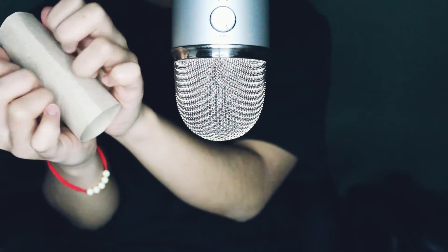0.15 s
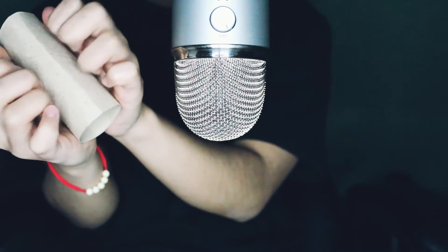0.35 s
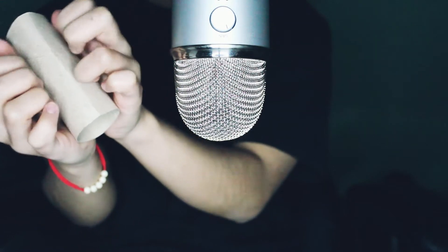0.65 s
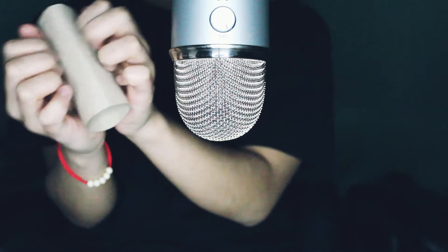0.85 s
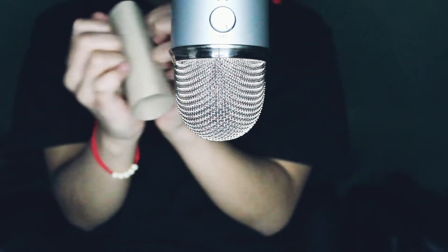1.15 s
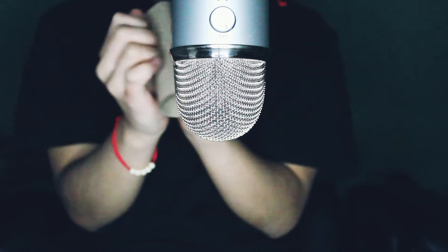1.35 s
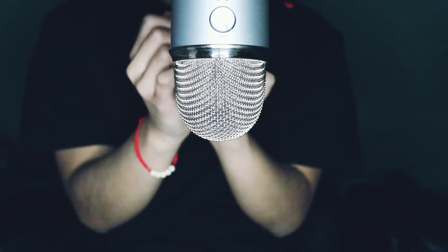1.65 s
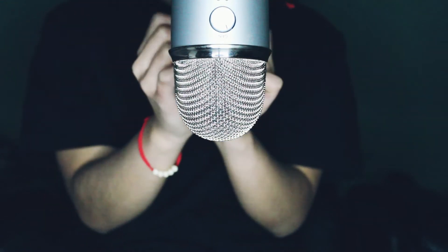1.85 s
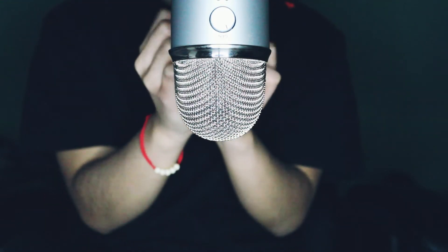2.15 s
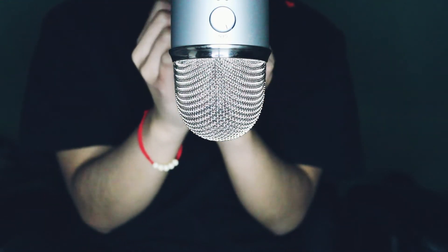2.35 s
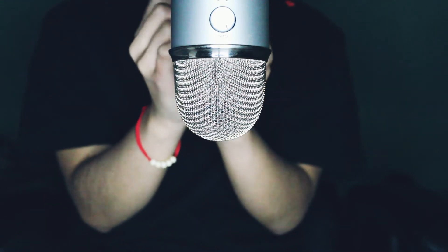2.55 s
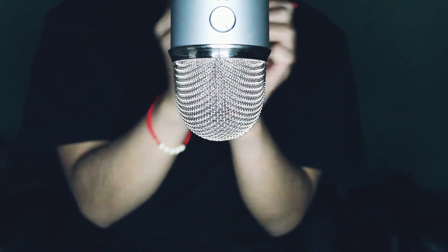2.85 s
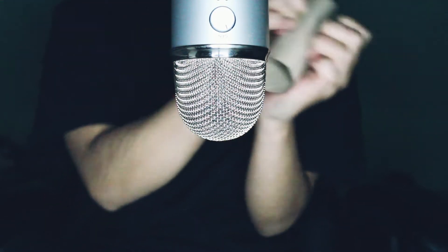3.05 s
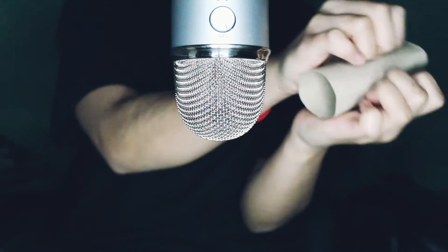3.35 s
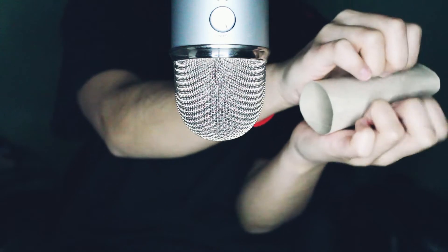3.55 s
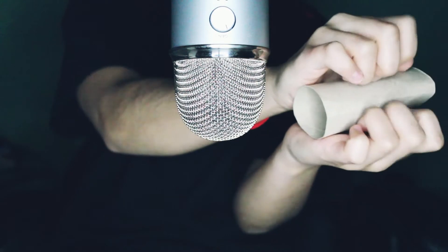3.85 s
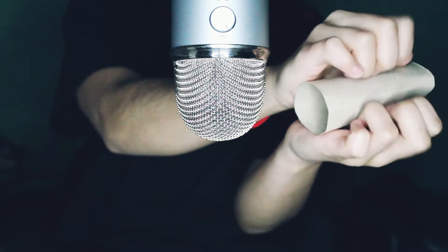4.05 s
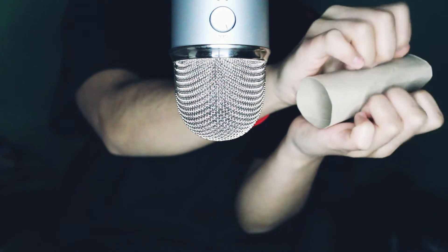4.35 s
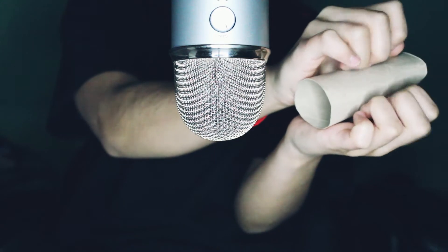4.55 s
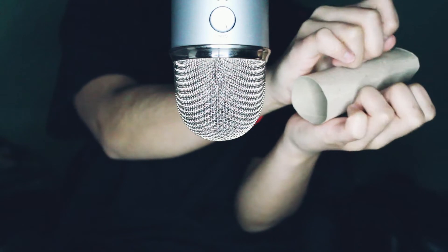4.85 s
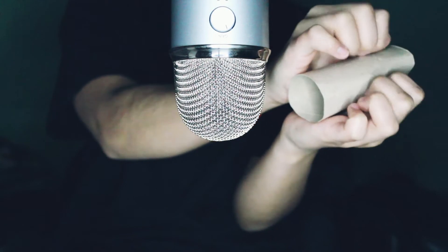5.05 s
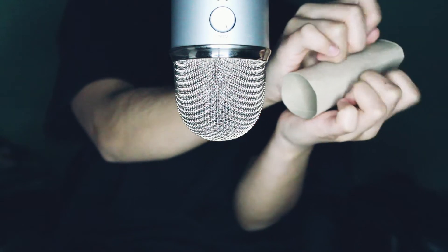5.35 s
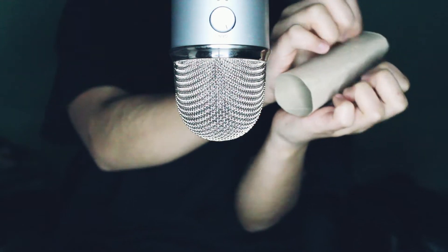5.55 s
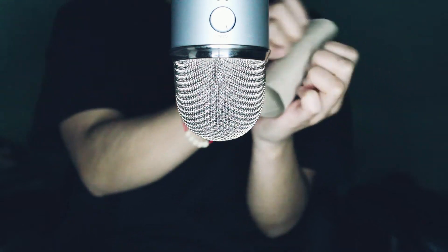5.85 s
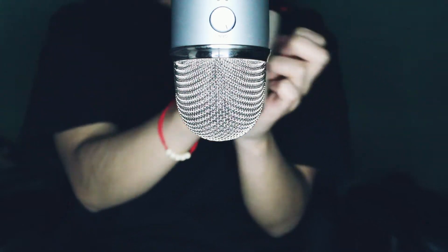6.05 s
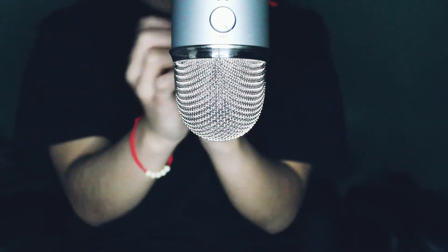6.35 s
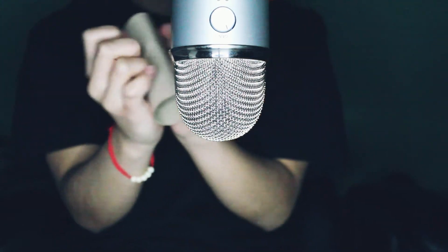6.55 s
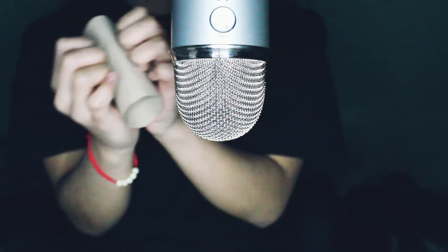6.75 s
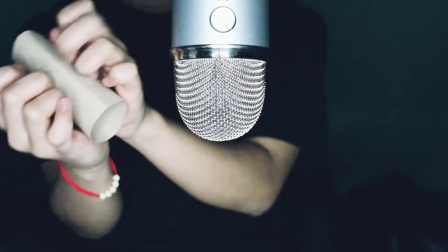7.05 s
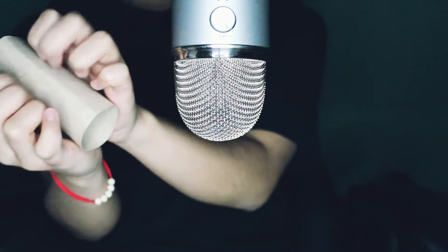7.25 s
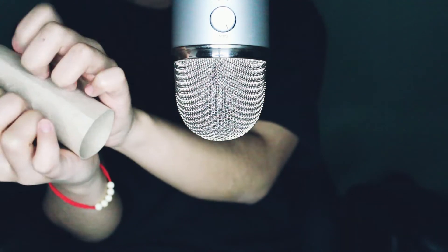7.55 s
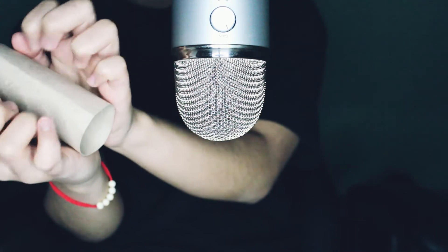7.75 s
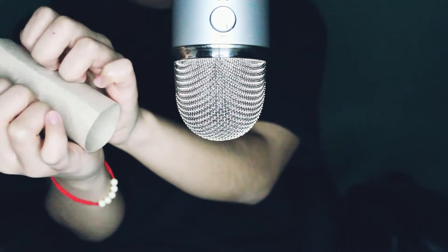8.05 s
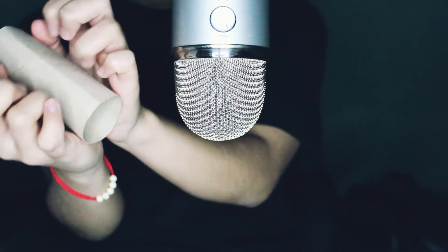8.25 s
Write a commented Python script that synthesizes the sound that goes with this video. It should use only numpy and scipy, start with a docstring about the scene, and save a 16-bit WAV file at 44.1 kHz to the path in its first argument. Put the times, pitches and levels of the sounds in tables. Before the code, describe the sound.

Fingertips and nails tap a hollow cardboard tube very close to a stereo microphone in a small quiet room. Soft, busy taps and scuffs start on the left, pass behind the microphone growing denser and brighter with a few low thuds, then become louder, hollow, separate knocks on the right. They return through the centre to the left, thinning and fading.

```python
"""Fingers on a cardboard tube, close to the microphone

In a small, quiet room, fingers drum and scratch on a tube carried from side to side near a stereo microphone.
Each touch is a burst of blows and noise rung through the tube's resonances, then a short drag of uneven grains.
Scrapes, faint to strong and short to long, are such grains without a tap.
The wall also flexes with a soft thump, which only so near a microphone picks up.
Deep jolts are band-passed noise; sparse reflections and steady coloured noise make the room."""
import sys
import numpy as np
from scipy import signal
from scipy.fft import rfft, irfft
from scipy.io import wavfile
from scipy.ndimage import uniform_filter1d

SR = 44100
rng = np.random.default_rng(int(sys.argv[2]) if len(sys.argv) > 2 else 0)


def unload_audio(sound):
    """Save the sound as a 16-bit wav file, at the path given as the first command line argument."""
    columns = np.transpose(np.atleast_2d(sound))
    # keep every value between -1 and 1, then stretch to whole-number steps
    steps = np.round(np.clip(columns, -1, 1) * 32767)
    wavfile.write(sys.argv[1], SR, steps.astype(np.int16))


N = 370881  # length in samples

SIZE = 2048  # samples in a response before it is cut or convolved
HZ = np.fft.rfftfreq(SIZE, 1 / SR)
# Where the tube is held before the microphone. Each row: time in seconds, left minus right in dB.
PATH = [(0, 13), (1.35, 8.5), (2.1, -2.5), (3.3, -1.5), (4.2, -16), (5.9, -12.5), (6.7, -2.5), (7.5, 7)]
REFERENCE_TAP_DB, USUAL_BRIGHT_DB = -6.5, 7.5  # a tap's force and brightness are judged against these
GRAIN_SPREAD_DB = 4  # how uneven the grains of a dragging nail are
DRAG_RISE_S, DRAG_LIFT_S, DRAG_UNEVEN_DB = 0.0026, 0.018, 4
TREMBLE = 0.22  # push of a drag on the wall, as a share of the drag
LEAD_SAMPLES = 20  # the capsule responses start this late, to leave room for their phase turn


def amp(db):
    """Decibels to gain."""
    return 10 ** (np.asarray(db) / 20)


def evened(x):
    """Scales to an rms of one."""
    return x / np.sqrt(np.mean(x ** 2) + 1e-20)


def read(points, hz):
    """A spectrum in dB, joined on a log-frequency axis."""
    f, db = np.transpose(points)
    return np.interp(np.log(hz + 1), np.log(f), db)


def at(curve, s):
    """Value of a control curve at time s."""
    return np.interp(s, *np.transpose(curve))


def add(mix, s, sound):
    """Mixes a sound into both channels at time s, cut at the end of the scene."""
    part = mix[:, round(s * SR):][:, :sound.shape[1]]
    part += sound[:, :part.shape[1]]


def ring(db):
    """The minimum-phase impulse response, of unit energy, that has this spectrum."""
    cepstrum = irfft(np.log(amp(db)))
    # folding the cepstrum forward in time makes the response causal
    cepstrum[1:SIZE // 2] *= 2
    cepstrum[SIZE // 2 + 1:] = 0
    response = irfft(np.exp(rfft(cepstrum)))
    return evened(response) / np.sqrt(SIZE)


def ripple(width_hz):
    """Random peaks and dips over frequency: every spot on the tube answers differently."""
    knots = np.arange(0, SR, width_hz)
    heights = rng.standard_normal(SIZE)[:len(knots)]
    return np.interp(HZ, knots, heights)


def grains(count, spread_db):
    """Noise of uneven grains: paper fibres catching and letting go."""
    grain_db = spread_db * np.minimum(rng.exponential(1, count), 6)
    return evened(rng.standard_normal(count) * amp(grain_db))


def uneven(count):
    """The stick and slip of a moving finger: slow chance of rms one."""
    return evened(uniform_filter1d(rng.standard_normal(count), size=300))


def hush():
    """The quiet room: steady noise of rms one, independent in the two channels."""
    # Room background. Each row: frequency in Hz, relative density in dB per Hz.
    background = [(20, -8), (70, -1), (450, -17), (1400, -14.5), (16000, -30)]
    noise = rng.standard_normal((2, N + SIZE))
    coloured = signal.fftconvolve(noise, ring(read(background, HZ))[None], axes=1)
    return evened(coloured[:, SIZE:N + SIZE])


def touches():
    """Taps and grazes in order: (s, level dB, brightness dB, sharpness of the first blow)."""
    # The clear taps. Each row: start in seconds, level in dB, brightness in dB (a nail high, a fingertip low).
    clear_taps = [(0.087, -20.5, -3), (0.1445, -18, 4), (0.3154, -18.5, 4), (0.449, -19, 4),
                  (0.5302, -22, 10), (0.597, -20.5, 15), (0.6147, -16, 5), (0.6848, -19, 4.5),
                  (0.744, -21, 6.5), (0.8264, -22, 2), (0.9358, -21.5, -5), (1.0051, -22, 2),
                  (1.0857, -18.5, 12), (1.15, -20.5, 7), (1.334, -19, 11), (1.386, -19.5, 10),
                  (1.577, -20, 4), (1.586, -14.5, 2.5), (1.6793, -15.5, 9.5), (1.7363, -15, 8),
                  (1.7897, -17.5, 7.5), (1.8114, -21.5, 13), (1.8937, -16, 13), (1.9021, -19, 13),
                  (1.9778, -20, -3), (2.0044, -14.5, 12.5), (2.0481, -17, 14.5), (2.0893, -12, 9.5),
                  (2.1976, -19.5, 7), (2.2216, -15, 10), (2.2721, -16.5, 8.5), (2.3048, -23.5, 10),
                  (2.313, -16.5, 11), (2.3502, -15, 10), (2.4117, -11.5, 10.5), (2.4917, -16, 9),
                  (2.6197, -16, 5), (2.6281, -18, 13), (2.7012, -18, 13.5), (2.7271, -16.5, 14.5),
                  (2.8056, -17, 6), (2.8251, -18.5, 10), (2.8548, -14, 3), (2.9158, -16, 14),
                  (2.9527, -19.5, 4.5), (3.0036, -14, 5.5), (3.0402, -17.5, 9), (3.0927, -12, 12),
                  (3.105, -11, 2), (3.1967, -14, 6), (3.2115, -17, -2), (3.284, -20.5, 8),
                  (3.302, -18.5, 2.5), (3.353, -11.5, 3), (3.428, -17.5, 5), (3.435, -15.5, 13),
                  (3.5935, -18, -4.5), (3.658, -21.5, 3), (3.7866, -17.5, 14), (3.8433, -17, 4),
                  (3.8727, -15.5, 1.5), (4.139, -13.5, 7.5), (4.2331, -14.5, 16.5), (4.314, -20, -8),
                  (4.3599, -17, 9.5), (4.4043, -16.5, 4), (4.426, -19.5, -5), (4.4813, -13.5, 23),
                  (4.5193, -13.5, 2), (4.5944, -19, 7), (4.6486, -15, 12), (4.7213, -15.5, 17.5),
                  (4.806, -11.5, 4), (4.8932, -17.5, 7.5), (4.94, -14.5, 5.5), (4.9804, -16.5, 17),
                  (5.063, -15.5, 1), (5.1564, -9.5, 0), (5.297, -18, 2.5), (5.3778, -19, 0),
                  (5.4672, -19, 13), (5.5484, -12.5, -3), (5.569, -13, 13.5), (5.7365, -12, 9),
                  (5.8331, -11.5, 5.5), (5.933, -11.5, 13.5), (5.9654, -15.5, 0), (6.1792, -15.5, 8.5),
                  (6.2723, -14.5, 3), (6.2964, -18.5, 8), (6.3641, -15.5, 14), (6.395, -18.5, 3),
                  (6.6342, -20, 13.5), (6.676, -10, 14), (6.7653, -14, 13), (7.1337, -23.5, 13),
                  (7.151, -19, 8.5), (7.2616, -17.5, 11.5), (7.2676, -17.5, 13.5), (7.6241, -23, 14.5),
                  (7.671, -21, 6), (7.71, -23.5, 13), (7.8519, -25, -2), (7.949, -27.5, 3.5),
                  (8.0423, -23, 8.5), (8.1302, -26, 12.5), (8.3717, -30, 1)]
    # Light grazes: a neighbouring finger scuffs the tube without a sharp blow. Each entry: start in seconds.
    graze_starts = [0.016, 0.045, 0.209, 0.417, 0.551, 0.84, 1.014, 1.166, 1.245, 1.283, 1.439, 1.505,
                    1.666, 1.708, 2.116, 2.526, 3.336, 3.4, 3.53, 3.669, 3.755, 3.771, 3.967, 4.058, 4.18,
                    4.331, 4.737, 4.829, 4.963, 7.073, 7.489, 7.542]
    graze_db = -24  # average level
    grazes = [(s, graze_db + rng.standard_normal(), USUAL_BRIGHT_DB, 0) for s in graze_starts]
    return sorted([(*row, 1) for row in clear_taps] + grazes)


def side(s):
    """Left minus right dB of a touch at time s, somewhere along the tube."""
    return at(PATH, s) + rng.standard_normal()


def cupping(side_db):
    """How far the tube is cupped in the hands right behind the microphone, 0-1."""
    return np.exp(-(side_db / 5.04) ** 2)


def facing(side_db):
    """Spectrum in dB: the top treble is open on the left and shaded by the hands on the right."""
    air_hz, air_per_side = 5960, 0.2  # dB of top treble per dB of side
    tilt = np.tanh(2 * np.log((HZ + 1) / air_hz)) * np.minimum(HZ / air_hz, 1)
    return air_per_side * side_db * tilt


def tube(side_db, bright_db):
    """Spectrum in dB of the tube at one touch: cupping raises its pitch, a nail its treble, each spot differs."""
    # Resonances of the open tube. Each row: frequency in Hz, width in Hz, average level in dB,
    # change in dB when it is cupped behind the microphone.
    modes = [(765, 230, 10.5, -10), (1353, 154.5, 21, -1.13), (1810, 345, 7, 2), (2728, 308, 5, 0)]
    # Broad colour of the cardboard under the resonances. Each row: frequency in Hz, level in dB.
    wall = [(100, -5), (450, 1), (1100, -42), (2300, -4), (4800, -3.5), (10000, -13), (15500, -20.5)]
    spot_spread_db, rise, rise_per_db = 1.68, 0.054, 0.005  # pitch rise as a share, more for each dB of brightness
    cupped = cupping(side_db)
    hz = HZ / (1 + cupped * (rise + rise_per_db * bright_db))
    power = amp(read(wall, hz)) ** 2
    for f, width, db, change_db in modes:
        spot_db = spot_spread_db * rng.standard_normal()
        peak = 1 / (1 + ((hz - f) / width) ** 2) ** 2
        power += amp(db + cupped * change_db + spot_db) ** 2 * peak
    treble = 1 / (1 + (1800 / (HZ + 1)) ** 6)
    return 10 * np.log10(power) + bright_db * treble + 2.37 * ripple(325.0)


def capsules(db, side_db):
    """Left and right responses: off the axis the two capsules differ in level, phase and fine colour."""
    off_axis = np.tanh(side_db / 6)
    apart_db = 2 * (1 + abs(off_axis)) * ripple(628.0) * np.minimum(HZ / 2500, 1)
    turn = np.exp(-.5j * off_axis)
    left = irfft(rfft(np.roll(ring(db + apart_db), LEAD_SAMPLES)) * turn)
    right = irfft(rfft(np.roll(ring(db - apart_db), LEAD_SAMPLES)) / turn)
    gains = evened(amp(np.array([[side_db], [-side_db]]) / 2))
    return gains * np.array([left, right])[:, :SIZE // 2]


def tap(response, sharpness, crunch=0.71, crunch_s=0.0027, tap_s=0.0062, settle_s=0.0011):
    """A first blow, smaller ones as the finger settles, and a crunch of fibres, with the energy of tap_s at rms one."""
    settling_blows, settle_share = 2, 0.48  # the share is their greatest size
    t = np.arange(SIZE // 2) / SR
    fibres = grains(len(t), 2.34) * np.sqrt(t) * np.exp(-2 * t / crunch_s)
    blow = crunch * evened(fibres) / np.sqrt(len(t))
    blow[0] += sharpness
    for delay, size in rng.random((settling_blows, 2)):
        blow[int(2 * delay * settle_s * SR)] += settle_share * size
    sound = signal.fftconvolve(response, blow[None], axes=1)
    return evened(sound) * np.sqrt(tap_s * SR / sound.shape[1])


def stroke(gap, longest_s=0.11, fade_db_per_s=80):
    """Pressure of a dragging finger: it lands, eases unevenly and lifts by the next touch unless that is too soon."""
    t = np.arange(SR // 5) / SR
    end_s = np.clip(gap, DRAG_LIFT_S, longest_s)
    lift = np.clip((end_s - t) / DRAG_LIFT_S, 0, 1)
    easing = amp(DRAG_UNEVEN_DB * uneven(len(t)) - fade_db_per_s * t)
    return np.minimum(t / DRAG_RISE_S, 1) * lift * easing


def rubbed(drag, side_db, bright_db):
    """The grains of a dragging nail, coloured by paper and tube."""
    # Colour of nail on paper, on top of the wall's. Each row: frequency in Hz, level in dB.
    paper = [(450, 4.5), (1400, -1.5), (5000, 5.5), (13000, 9.5)]
    response = capsules(tube(side_db, bright_db) + read(paper, HZ) + facing(side_db), side_db)
    return signal.fftconvolve(response, drag[None], axes=1)


def flexed(push, side_db):
    """The low thump of the wall giving way under a push: deeper on the right, muffled where cupped."""
    # Colour of the flexing wall. Each row: frequency in Hz, level in dB.
    thump = [(22, -31), (60, -2.5), (300, -3), (2000, -54.5)]
    deep_hz, deep_per_side = 80, 0.31  # dB of deep bass per dB of side to the right
    muffle_hz, muffle_db = 232, 3.5  # the muffling is complete above this pitch
    ripple_hz = 128  # spacing of the chance peaks
    # the near field mostly reaches the capsules in opposite polarity
    left, left_spread, right = -0.51, 0.66, 1.23
    deep_db = -deep_per_side * min(side_db, 0) * np.exp(-(HZ / deep_hz) ** 2)
    flex_db = read(thump, HZ) + deep_db + 2 * ripple(ripple_hz)
    flex_db = flex_db - muffle_db * cupping(side_db) * np.clip(2 * HZ / muffle_hz - 1, 0, 1)
    flex = np.array([ring(flex_db + 2 * ripple(ripple_hz)) for _ in range(2)])
    gains = np.array([[left + left_spread * rng.standard_normal()], [right]])
    return gains * signal.fftconvolve(flex, push[None], axes=1)


def tapping():
    """Each touch rings and flexes the tube; the finger then drags briefly."""
    # The wall's thump as the tube comes nearer and turns away. Each row: time in seconds,
    # relative strength in dB under a reference tap.
    nearness = [(0, -22), (1.3, -27.5), (1.65, -22), (3.3, -28), (4.3, -23.5), (6.3, -35.5), (8.1, -26)]
    # How firmly a finger stays on. Each row: time in seconds, level of the drag in dB after a reference tap.
    firmness = [(0, -31), (1.3, -34.5), (5.2, -33), (6, -44), (8.1, -36)]
    drag_follows, thump_follows = 0.26, 0.47  # dB for each dB that a tap is above the reference
    drag_bright_share = 0.33  # how much of a tap's brightness its drag keeps
    blow = 23  # scale of a tap's push on the wall
    out, rows = np.zeros((2, N)), touches()
    gaps = np.diff([row[0] for row in rows], append=N / SR)
    for (s, tap_db, bright_db, sharpness), gap in zip(rows, gaps):
        side_db = side(s)
        harder_db = tap_db - REFERENCE_TAP_DB
        nail_db = bright_db - USUAL_BRIGHT_DB
        early_s = s - LEAD_SAMPLES / SR
        response = capsules(tube(side_db, nail_db) + facing(side_db), side_db)
        add(out, early_s, amp(tap_db) * tap(response, sharpness))

        pressure = amp(at(firmness, s) + drag_follows * harder_db) * stroke(gap)
        drag = pressure * grains(len(pressure), GRAIN_SPREAD_DB)
        add(out, early_s, rubbed(drag, side_db, drag_bright_share * nail_db))

        push = TREMBLE * drag
        thump_db = at(nearness, s) + thump_follows * harder_db + 2 * rng.standard_normal()
        push[0] += blow * amp(thump_db)
        add(out, s, flexed(push, side_db))
    return out


def room(x, t60=0.11, first_s=0.0034):
    """A short tail of sparse reflections, different at each capsule."""
    t = np.arange(SR // 2) / SR
    reflections = rng.standard_normal((2, len(t))) * (rng.random((2, len(t))) < .1)
    decay = (t > first_s) * amp(-60 * t / t60)
    tail = evened(reflections * decay) / np.sqrt(len(t))
    return signal.fftconvolve(x.mean(0)[None], tail, axes=1)[:, :N]


def scraping():
    """Scrapes, faint to strong and short to long: the nail catches, eases unevenly and lifts."""
    # Scrapes along the paper. Each row: start in seconds, length in seconds to the middle of the lift,
    # level in dB of the pressure halfway along, about which it varies.
    scrapes = [(0.153, 0.025, -27), (0.256, 0.044, -31), (2.097, 0.11, -33), (3.354, 0.06, -33),
               (3.594, 0.039, -30.5), (3.834, 0.05, -26), (4.386, 0.092, -35.5), (4.591, 0.085, -33.5),
               (4.725, 0.025, -26), (4.965, 0.04, -32), (5.304, 0.072, -33), (5.377, 0.3, -40),
               (5.734, 0.031, -32.5), (5.836, 0.21, -39), (6.183, 0.074, -30), (6.296, 0.17, -36),
               (6.58, 0.19, -44), (6.887, 0.049, -44.5), (7.275, 0.076, -52)]
    fade_db = 11.5  # over the length of a scrape
    out, t = np.zeros((2, N)), np.arange(SR // 4) / SR
    for start, length, db in scrapes:
        shape = np.minimum(t / DRAG_RISE_S, 1) * np.clip((length - t) / DRAG_LIFT_S + .5, 0, 1)
        easing_db = fade_db * (.5 - t / length) + DRAG_UNEVEN_DB * uneven(len(t))
        pressure = shape * amp(db + easing_db)
        drag = pressure * grains(len(t), GRAIN_SPREAD_DB)
        add(out, start, rubbed(drag, side(start), 0))
        add(out, start, flexed(TREMBLE * drag, at(PATH, start)))
    return out


def jolting(shake_s=0.026):
    """Deep thuds that go on as a rumbling shudder, alike at both capsules."""
    # The cupped hands jolt the tube right behind the microphone. Each row: start in seconds,
    # level in dB (rms over the 0.2 s of a jolt).
    jolts = [(2.105, -40), (2.219, -45), (2.347, -42), (2.412, -35), (2.555, -40), (6.677, -37)]
    # Band of a jolt: lower and upper edge in Hz.
    jolt_hz = [45, 192]
    out, t = np.zeros((2, N)), np.arange(SR // 5) / SR
    deep = signal.butter(3, jolt_hz, "bandpass", fs=SR, output="sos")
    for s, db in jolts:
        shudder = rng.standard_normal(len(t)) * np.exp(-t / shake_s)
        push = evened(shudder) / np.sqrt(len(t))
        push[0] += .5
        add(out, s, amp(db) * evened(signal.sosfilt(deep, push))[None])
    return out


def scene():
    """The tube, its reflections and the quiet room."""
    near = tapping() + scraping() + jolting()
    return near + amp(-10.5) * room(near) + amp(-52.5) * hush()


def record(dry):
    """The recorder clips at full scale, where the hardest taps overload it; then its band ends near 16 kHz."""
    band = signal.firwin(255, 16000, window=("kaiser", 8), fs=SR)
    return signal.oaconvolve(np.clip(dry, -1, 1), band[None], "same")


dry = scene()
out = record(dry)
unload_audio(out)
```